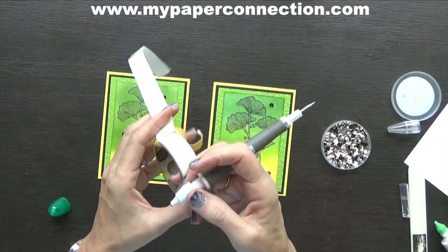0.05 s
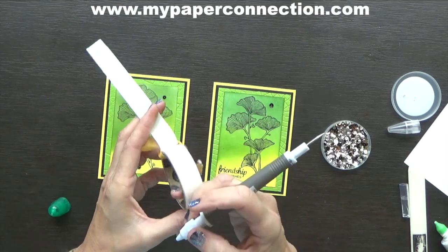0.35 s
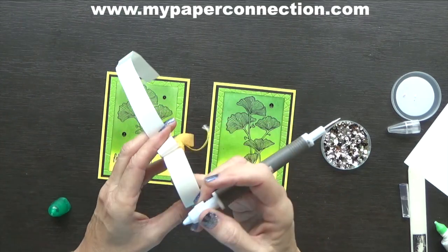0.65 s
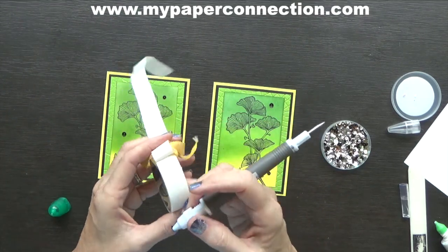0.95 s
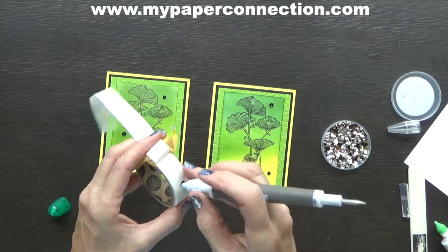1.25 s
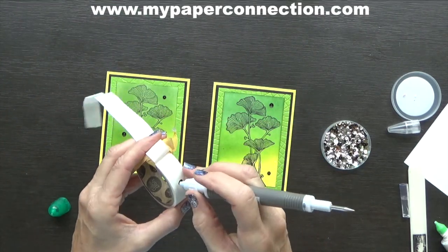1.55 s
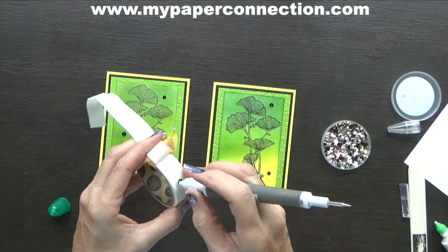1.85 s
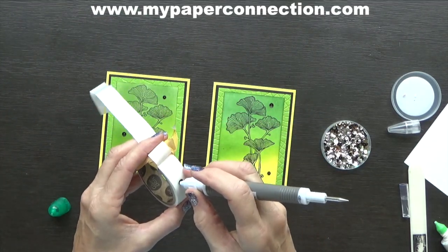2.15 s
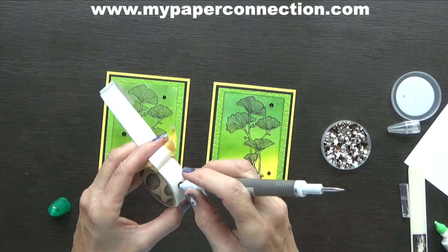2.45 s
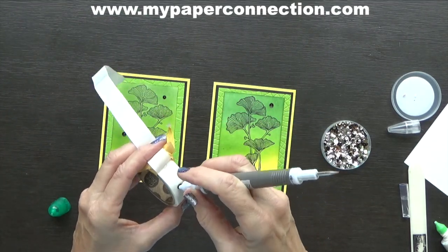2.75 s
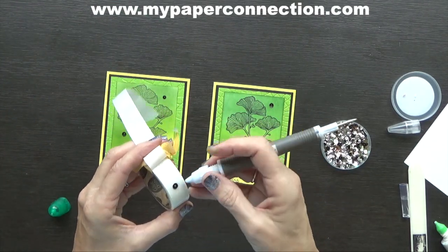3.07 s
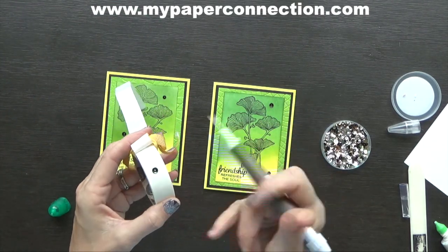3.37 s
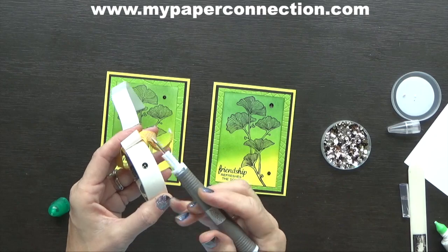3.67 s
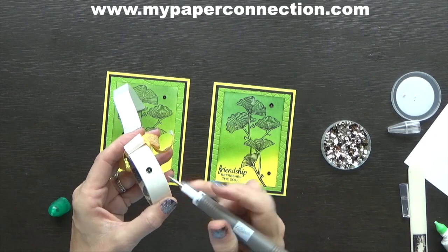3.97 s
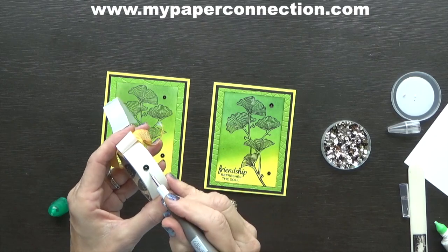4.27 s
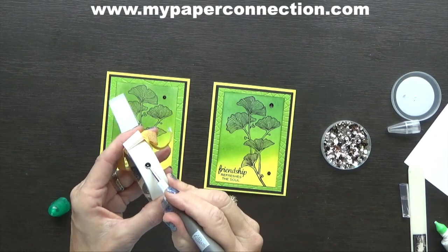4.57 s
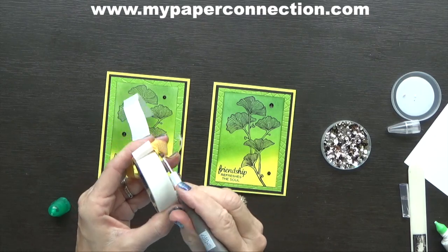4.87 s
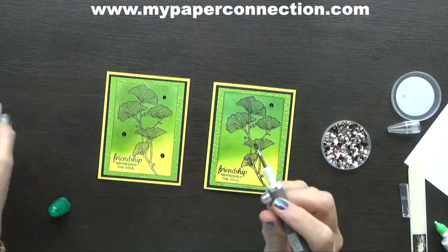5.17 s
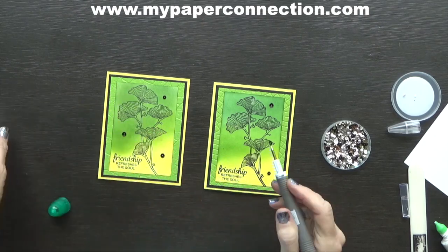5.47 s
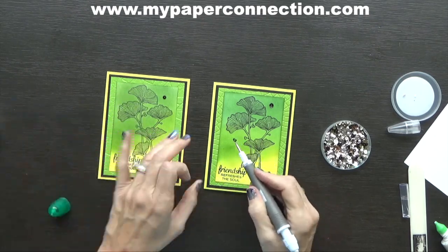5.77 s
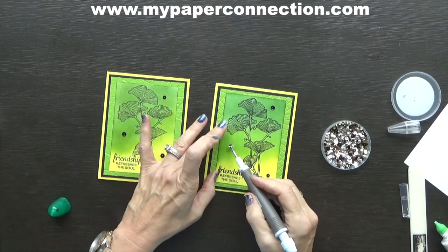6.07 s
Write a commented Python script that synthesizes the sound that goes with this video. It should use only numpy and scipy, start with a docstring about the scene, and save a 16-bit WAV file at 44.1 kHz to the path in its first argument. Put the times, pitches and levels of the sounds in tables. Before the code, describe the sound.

A paper strip slides softly, a plastic tool and fingernails click against a hollow roll, and the roll is set down in a quiet room.

```python
"""At a table in a small room, hands work with a roll of glue dots. Its paper backing slides and rustles as
fibres catch and let go. A plastic pick-up tool and fingernails click against the hollow roll, and both tool and
roll ring; fingers rub, and the tool scratches off a dot. The roll is carried to the left and set down with a
soft knock. Underneath are room air, mains hum and a small mechanism's faint, fast ticking."""
import sys
import numpy as np
from scipy import signal
from scipy.fft import rfft, irfft, next_fast_len
from scipy.io import wavfile
from scipy.ndimage import uniform_filter1d

SR = 44100
rng = np.random.default_rng(int(sys.argv[2]) if len(sys.argv) > 2 else 0)


def transcribe(u):
    """Save the signal u as a 16-bit wav file named by the first command-line argument.

    u: samples, shape (n,) or (channels, n), limited to [-1, 1]; the rate is SR.
    q: integer samples, one column per channel.
    """
    v = np.clip(np.atleast_2d(u).T, -1, 1)
    q = np.round(v * 32767).astype(np.int16)
    wavfile.write(sys.argv[1], SR, q)


N = 269803
TIME = np.arange(N) / SR
FREQ = np.fft.rfftfreq(next_fast_len(N, True), 1 / SR)

# tone colour of the room air (how strong each frequency is): f/Hz, level/dB
AIR_COLOUR = [(25, -2.5), (38, 6.5), (52, -8), (82, -2.5), (100, 0.5), (140, -6.5), (300, -5), (500, -9),
              (1000, -13), (2200, -15), (4000, -19), (15800, -24.5)]
# how alike left and right are in the room: f/Hz, likeness (1 = the same)
LIKENESS = [(60, 1), (150, 0.94), (300, 0.7), (600, 0.023), (1500, 0.033), (2500, 0.123), (4000, 0.44),
            (6500, 0.94), (8000, 1)]
# mains hum and a thin whine: f/Hz, level/dB
HUM_TONES = [(60, -66), (120, -77), (180, -71.5), (7892, -85)]
# steady whirr of machinery: f/Hz, width/Hz, level/dB
WHIRR_BANDS = [(272, 25, -83.5), (1398, 110, -77.5), (7780, 120, -83.5)]
# tones of one tick: f/Hz, level/dB, time to fade by 60 dB/s, change on every second tick/dB
TICK_TONES = [(2978, -61.5, 0.064, 0.5), (3640, -60, 0.026, -33), (4910, -64, 0.022, -8)]
# when the fingers make stray clicks: start/s, end/s
FIDGET_TIMES = [(0, 0.024), (3.301, 3.6), (4.111, 4.27), (4.978, 5.05)]
# tool and nail clicks: t/s, level/dB over 1 ms, decay/s, lows/dB, highs/dB, f/Hz of the struck spot
CLICKS = [(0.3252, -29, 0.0019, -9, 3, 7300), (0.795, -32.5, 0.00066, -15, 8, 7350),
          (2.8861, -41, 0.00029, -9, -1, 5000), (3.0357, -27.5, .001, 0, -3, 6750),
          (3.1901, -41, 0.0045, 16, 9, 7700), (3.254, -35.5, .0015, 4.5, 3, 10400),
          (3.2605, -34, 0.0018, 6, 2, 6500), (3.2925, -31, 0.0077, 8.5, 2, 6400),
          (3.3143, -30, 0.001, 6, -2, 6600), (3.3507, -26, 0.0017, 3.5, -1, 8750),
          (3.3706, -25, 0.0028, 9, 5, 6400), (3.3796, -28.5, 0.0045, 7.5, -1, 2800),
          (3.4233, -34, 0.0033, 8.5, -8, 5250), (3.4428, -32.5, 0.0033, 1.5, 2, 2560),
          (3.5711, -32.5, .0012, 0.5, 7, 2520), (3.612, -41.5, 0.0023, -2, 12, 10300),
          (3.8037, -39, 0.0033, 9, 0, 2510), (3.8141, -37, 0.0038, 5, -8, 2540),
          (3.887, -25.5, 0.0049, 3.5, -1, 6570), (3.904, -28, 0.0052, 5, 9, 6600),
          (3.9281, -24.5, 0.0052, 3.5, -9, 10500), (4.1025, -15, .0006, -0.5, -1, 7830),
          (4.1038, -23, 0.00095, 3, -21, 3990), (4.1067, -31, 0.0031, 16, 2, 7800),
          (4.1645, -36.5, 0.0014, 14, 5, 7800), (4.2238, -40.5, 0.0035, 17, 10, 10300),
          (4.247, -44, .003, 19, 5, 9700), (4.3433, -43, 0.0014, 15, 13, 7700),
          (4.8684, -17.5, 0.0019, -5, 6, 2920), (4.8723, -22, 0.0012, 1.5, -4, 5890),
          (4.8795, -20.5, 0.0016, 4.5, 7, 7960), (4.881, -24.5, 0.0019, 12, -17, 3450),
          (4.91, -38, .0028, 15, 5, 7600), (5.13, -38, 0.0036, -2, 5, 7460),
          (5.215, -24.5, .0033, 4, -2, 8400), (5.2429, -30.5, 0.0015, -19, 1, 6150),
          (5.2573, -24, 0.0076, 2.5, 0, 8740), (5.4353, -20.5, 0.003, -1.5, 5.5, 10260),
          (5.4717, -30, 0.0019, 7, 6, 9800), (5.49, -27.5, 0.0055, 1.5, -16, 5400),
          (5.5559, -20.5, 0.0055, -1.5, -7, 5000)]
# tone colour shared by all clicks: f/Hz, level/dB
CLICK_COLOUR = [(100, -54), (400, -16.5), (1000, -17.5), (1700, -14.5), (2600, -5.5), (3800, -6.5),
                (5100, -6), (6400, -3.5), (7200, -1.5), (8000, -0.1), (9700, 1), (11500, -10.5),
                (13500, -18), (16000, -22)]
# tones at which the plastic rings, the pick-up tool in the high ones and the hollow roll near 4 kHz: f/Hz,
# greatest boost/dB
PLASTIC_TONES = [(2560, 15.5), (2920, 12.5), (3450, 12), (3950, 25.5), (6380, 14), (7980, 20.5), (8700, 13),
                 (10250, 11)]
# two pulls of the backing strip, each a loudness curve: t/s, relative level/dB
STRIP_PULLS = [
    [(0.055, -59), (0.099, -38), (0.157, -52), (0.175, -40.5), (0.201, -49), (0.235, -41), (0.277, -47.5),
     (0.295, -45), (0.319, -48), (0.325, -48), (0.351, -77), (0.36, -64)],
    [(0.725, -66.5), (0.773, -44), (0.797, -48), (0.805, -61), (0.825, -55.5), (0.89, -72)],
]
# tone colour of sliding paper: f/Hz, level/dB
PAPER_COLOUR = [(150, -14), (500, -5.5), (1000, -11), (1800, -7), (3000, -6.5), (4800, -5.5), (6500, -2.5),
                (8000, 0.5), (9400, 3.5), (11000, -7), (13500, -12.5), (16000, -23)]
# skin rubbing on tool and paper: t/s of the peak, half length/s, level/dB
FINGER_RUBS = [(0.466, 0.023, -57), (0.998, 0.039, -65), (2.943, 0.028, -62), (3.128, 0.042, -63),
               (3.35, 0.098, -58), (3.685, 0.055, -62.5), (4.078, 0.033, -55.5), (4.21, 0.022, -73),
               (5.034, 0.046, -67.5), (5.193, 0.022, -55.5), (6.02, .04, -70)]
# tone colour of rubbing skin: f/Hz, level/dB
SKIN_COLOUR = [(500, -47), (2000, -20), (3000, -8.5), (5500, -15.5), (8000, -7), (9700, -3.5),
               (11500, -11.5), (15000, -30)]
# tone colour of the tool scratching at glue: f/Hz, level/dB
SCRATCH_COLOUR = [(600, 10), (1250, 13.5), (1900, -27), (4000, -14), (10000, 4), (15000, -16)]
# the roll landing on the table: t/s, level/dB over 1 ms
LANDINGS = [(5.257, -48.5), (5.4404, -37.5), (5.4752, -28)]
# tones of the table top: f/Hz, relative level/dB, time to fade by 60 dB/s
TABLE_TONES = [(235, -1.5, 0.071), (263, -1.5, 0.045), (470, -1.5, 0.016), (685, -4.5, 0.023),
               (900, -5, .018), (1050, -7, 0.016), (1360, -7, 0.02), (1690, -10, 0.033)]
# length of the room's echo: f/Hz, time to fade by 60 dB/s
ECHO_FADE = [(200, 0.36), (1000, 0.72), (3000, 0.48), (8000, 0.46), (14000, 0.33)]


def amp(db):
    """Turns decibels into a factor to multiply by."""
    return 10 ** (np.asarray(db) / 20)


def evened(x):
    """Scales a sound to an average strength (rms) of 1."""
    return x / np.sqrt(np.mean(x ** 2) + 1e-20)


def at_level(x, db):
    """Gives a short sound the energy of one millisecond at this level."""
    return amp(db) * x * np.sqrt(SR / 1000 / np.sum(x ** 2))


def look_up(points, hz):
    """Reads between a table's rows along a musical (logarithmic) frequency scale."""
    f, value = np.transpose(points)
    return np.interp(np.log(hz + 1), np.log(f), value)


def add(mix, s, sound):
    """Adds a sound to the mix, s seconds in."""
    part = mix[max(round(s * SR), 0):][:len(sound)]
    part += sound[:len(part)]


def filtered(x, gain):
    """Turns each frequency in FREQ up or down by its gain."""
    size = next_fast_len(N, True)
    return irfft(rfft(x, size) * gain, size)[..., :N]


def coloured(x, points):
    """Gives a sound a tone colour, at strength 1."""
    return evened(filtered(x, amp(look_up(points, FREQ))))


def ringing_filter(gain_db):
    """A filter with these gains that rings only after it is struck."""
    log_gain = np.log(amp(np.r_[gain_db, gain_db[-2:0:-1]]))
    return np.exp(np.conj(signal.hilbert(log_gain)))[:len(gain_db)]


def room_air(level_db=-62):
    """Air makes a soft rush, alike on both sides in the bass and different in the middle range."""
    a, b = rng.standard_normal((2, N))
    same = np.clip(look_up(LIKENESS, FREQ), 0, 1)
    colour = amp(look_up(AIR_COLOUR, FREQ))
    mid = filtered(a, colour)
    side = filtered(b, colour * np.sqrt((1 - same) / (1 + same)))
    return amp(level_db) * np.array([mid + side, mid - side]) / np.std(mid)


def hum():
    """Steady tones make the mains hum and a whine; narrow bands of noise make machinery whirr."""
    out = sum(amp(db) * np.sqrt(2) * np.sin(2 * np.pi * (hz * TIME + rng.random()))
              for hz, db in HUM_TONES)
    for hz, width, db in WHIRR_BANDS:
        band = 1 / (1 + (2 * (FREQ - hz) / width) ** 2)
        out += amp(db) * evened(filtered(rng.standard_normal(N), band))
    return out


def ticking(ticks_per_s=30.01, uneven_db=0.7, sag=0.21, glide_s=0.0027):
    """A small mechanism ticks, bright and dull in turn; each tick chirps upward."""
    out, t = np.zeros(N), np.arange(3000) / SR
    clock = t - sag * glide_s * (1 - np.exp(-t / glide_s))  # starts slow, so the pitch starts low
    rise = 1 - np.exp(-t / .001)
    for k, s in enumerate(np.arange(.004, N / SR, 1 / ticks_per_s)):
        for hz, db, fade_s, second_db in TICK_TONES:
            ring_db = db + k % 2 * second_db + uneven_db * rng.standard_normal() - 60 * t / fade_s
            add(out, s, amp(ring_db) * rise * np.sin(2 * np.pi * (hz * clock + rng.random())))
    return out


def stray_clicks(per_s=25, decay_s=0.0012, lows_db=4.5):
    """Fingers touch random spots as the grip changes; gives faint clicks as rows like those of CLICKS."""
    rows = []
    for start, end in FIDGET_TIMES:
        for when, strength, spot in rng.random((round((end - start) * per_s), 3)):
            level_db, spot_hz = -45.5 + 4 * strength, 5000 + 5500 * spot
            rows.append((start + when * (end - start), level_db, decay_s, lows_db, 0, spot_hz))
    return rows


def click(level_db, decay_s, lows_db, highs_db, spot_hz, ring=1, chatter=True, width_hz=340, size=2048):
    """A tool or nail strikes the plastic, chatters briefly and rings the tones of the spot it hits."""
    t, hz = np.arange(size) / SR, np.fft.rfftfreq(size, 1 / SR)
    strike = t == 0
    fade = np.exp(-t / decay_s) + 0.079 * np.exp(-t / 0.0088)
    force = rfft(strike + chatter * rng.standard_normal(size) * fade)
    force /= np.sqrt(uniform_filter1d(abs(force) ** 2, size=91))  # about even from low to high
    tone_hz, tone_db = np.transpose(PLASTIC_TONES)
    # tones near the spot's pitch ring fully, the others a little, by chance
    nearness = np.exp(-(np.log(tone_hz / spot_hz) / 0.073) ** 2)
    share = np.maximum(nearness, 0.31 * rng.random(len(tone_hz)))
    peaks_db = ring * share * tone_db / (1 + ((hz[:, None] - tone_hz) / width_hz) ** 2)
    tilt_db = np.interp(hz, [3000, 7000], [lows_db, 0]) + np.interp(hz, [8000, 14000], [0, highs_db])
    sound = irfft(force * ringing_filter(look_up(CLICK_COLOUR, hz) + tilt_db + peaks_db.max(axis=1)))
    taper = np.cos(np.pi / 2 * t / t[-1]) ** 2
    return at_level(sound * taper, level_db)


def friction(slips_per_s, spread_db, hiss):
    """Surfaces catch and let go: tiny slips of uneven size over a smooth hiss."""
    sizes = amp(spread_db * np.minimum(rng.exponential(1, N), 4))
    slips = sizes * rng.choice([-1, 1], N) * (rng.random(N) < slips_per_s / SR)
    return evened(slips) + hiss * rng.standard_normal(N)


def paper_strip(gain_db=-2, split_hz=4500, firm_pull_db=-49, low_db_per_s=50.5,
                flap_hz=5200, sink_hz_per_s=14500, flap_width_hz=900, flap_db=-15):
    """The backing slides; as more comes free, its lower range grows and the loose flap's pitch sinks."""
    slips = friction(slips_per_s=900, spread_db=1.5, hiss=0.6)
    rustle = coloured(slips, PAPER_COLOUR)
    low = filtered(rustle, 1 / (1 + (FREQ / split_hz) ** 4))
    high = rustle - low
    smoothing = np.poly([np.exp(-np.pi * flap_width_hz / SR)] * 2)
    out = np.zeros(N)
    for pull in STRIP_PULLS:
        s, db = np.transpose(pull)
        level_db = np.interp(TIME, s, db)
        age = np.clip(TIME, s[0], s[-1]) - s[0]
        moving = np.exp(-abs(TIME - s[0] - age) / 0.025)  # fades away outside the pull
        # keep the part of the slips that lies around the sinking pitch
        sweep = np.exp(2j * np.pi * np.cumsum(flap_hz - sink_hz_per_s * age) / SR)
        flap = evened((sweep * signal.lfilter([1], smoothing, slips / sweep)).real)
        free = 1 - np.exp(-(age / 0.11) ** 2)
        # the lower range starts weaker and follows most of the pull's rise and fall
        low_db = firm_pull_db - 5 + .85 * (level_db - firm_pull_db) + low_db_per_s * age
        out += moving * (amp(level_db) * (high + amp(flap_db) * free * flap) + amp(low_db) * low)
    return amp(gain_db) * out


def table_bounce(x, delay_s=0.001075, bounce=0.17):
    """The table top sends the sound back a millisecond later, which makes it hollow."""
    return filtered(x, 1 + bounce * np.exp(-2j * np.pi * FREQ * delay_s)) / np.sqrt(1 + bounce ** 2)


def finger_rubs():
    """Skin slides in short, bright swells as the fingers shift their grip."""
    swell = sum(amp(db) * np.exp(-.5 * ((TIME - s) / half) ** 2) for s, half, db in FINGER_RUBS)
    return swell * coloured(friction(slips_per_s=2200, spread_db=5.5, hiss=0.57), SKIN_COLOUR)


def tool_scratch(peak_s=4.58, half_length_s=.07, level_db=-64):
    """The tool's tip catches on a glue dot in a few scattered slips."""
    swell = amp(level_db) * np.exp(-.5 * ((TIME - peak_s) / half_length_s) ** 2)
    return swell * coloured(friction(slips_per_s=90, spread_db=7.5, hiss=0.25), SCRATCH_COLOUR)


def table_knock(level_db, band_hz=(170, 1500), puff_s=0.011, size=12000):
    """The roll lands, and the table top answers with a dull puff and a few fast-fading tones."""
    t = np.arange(size) / SR
    ring = sum(amp(db - 60 * t / fade_s) * np.sin(2 * np.pi * (hz * t + rng.random()))
               for hz, db, fade_s in TABLE_TONES)
    puff = rng.standard_normal(size) * np.exp(-t / puff_s)
    band = signal.butter(3, band_hz, "band", fs=SR, output="sos")
    return at_level(signal.sosfilt(band, ring + puff), level_db)


def room_echo(x, width=0.47, build_s=0.0037, wall_s=0.0341, size=24000):
    """Many echoes, with a bunch from the nearest wall, blend and die away, the highest notes first."""
    hz, t, (shared, apart) = signal.stft(rng.standard_normal((2, size)), SR, nperseg=256)
    same = np.clip(look_up(LIKENESS, hz), 0, 1)[:, None]
    side = width * np.sqrt((1 - same) / (1 + same)) * apart
    fade = amp(-60 * t / look_up(ECHO_FADE, hz)[:, None])
    tail = signal.istft(np.array([shared + side, shared - side]) * fade, SR, nperseg=256)[1][:, :size]
    age = np.arange(size) / SR
    build_up = 1 - np.exp(-(age / build_s) ** 2)
    wall = 0.95 * np.exp(-((age - wall_s) / 0.002) ** 2)
    tail = tail * (build_up + wall)
    return signal.oaconvolve(x[None], tail / np.linalg.norm(tail[0]), axes=1)[:, :N]


def scene(directions=3, carry_s=(4.99, 5.5), left_db=3, near_echo_db=-14.5, far_echo_db=-6):
    """Mixes the sounds of the hands, their echo and the steady background into left and right."""
    direct = table_bounce(paper_strip()) + finger_rubs() + tool_scratch()
    to_room = np.zeros((directions, N))  # clicks leave in different directions, each with its own echo
    to_room[0] = direct
    for k, (s, level_db, decay_s, lows_db, highs_db, spot_hz) in enumerate(CLICKS + stray_clicks()):
        add(direct, s, click(level_db, decay_s, lows_db, highs_db, spot_hz))
        # the room gathers sound from all sides of the roll, so it gets a plainer click
        plain = click(level_db, decay_s, lows_db + 3, highs_db, spot_hz, ring=0.43, chatter=False)
        add(to_room[k % directions], s, plain)
    knocks = np.zeros(N)
    for s, level_db in LANDINGS:
        add(knocks, s, table_knock(level_db))
    # as the roll is carried away, the sound moves left and gains echo
    pan = amp(np.outer([.5, -.5], np.interp(TIME, carry_s, [0, left_db])))
    echo_share = amp(np.interp(TIME, carry_s, [near_echo_db, far_echo_db]))
    echo = sum(room_echo(sound * echo_share + knocks * amp(-9)) for sound in to_room)
    return pan * (direct + knocks) + echo + room_air() + hum() + ticking()


def record(dry, cutoff_hz=16000):
    """Cuts away the very highest treble."""
    low_pass = signal.firwin(255, cutoff_hz, window=("kaiser", 9), fs=SR)
    return signal.oaconvolve(dry, low_pass[None], "same")


dry = scene()
out = record(dry)
transcribe(out)
```